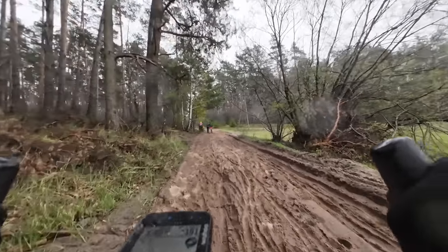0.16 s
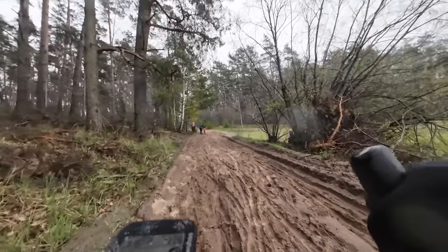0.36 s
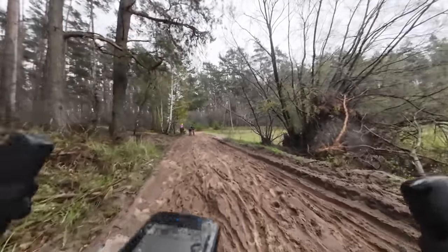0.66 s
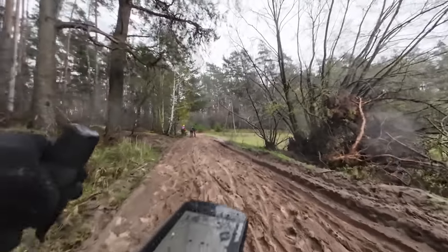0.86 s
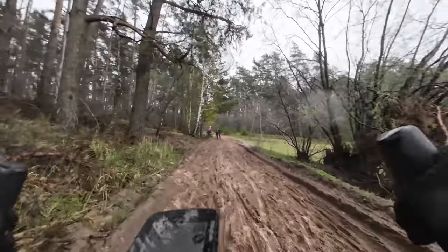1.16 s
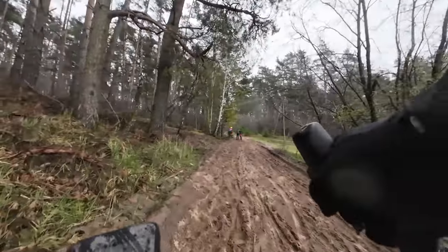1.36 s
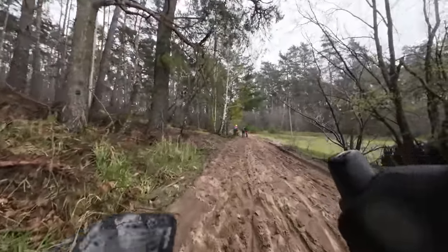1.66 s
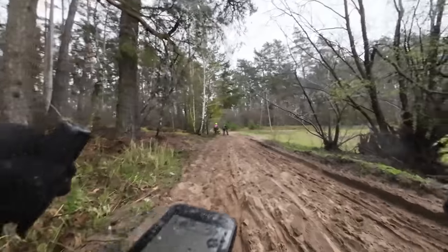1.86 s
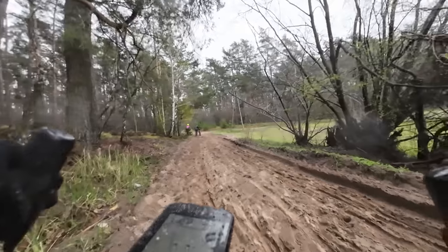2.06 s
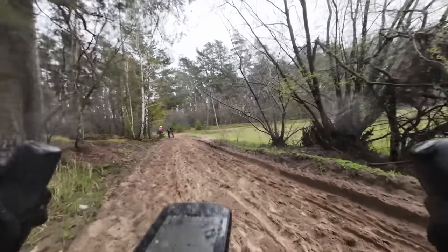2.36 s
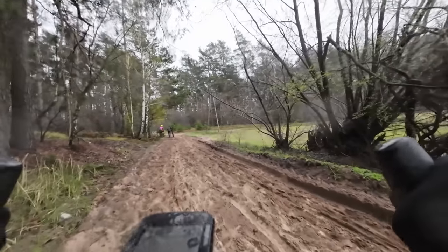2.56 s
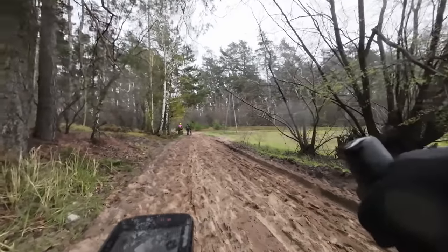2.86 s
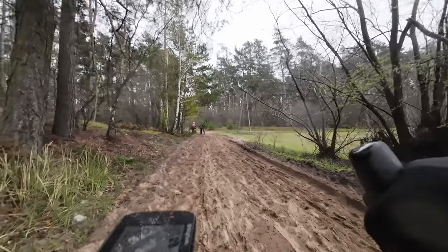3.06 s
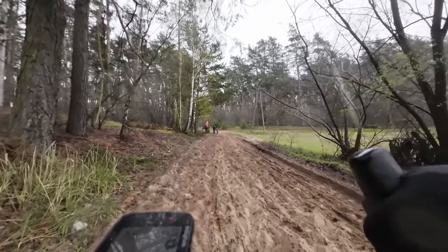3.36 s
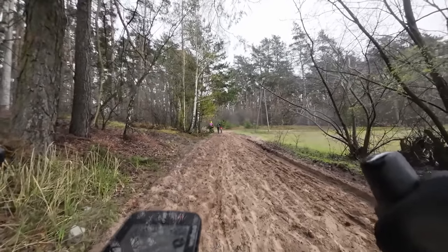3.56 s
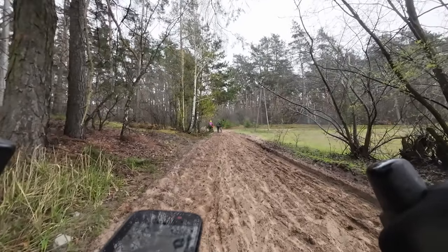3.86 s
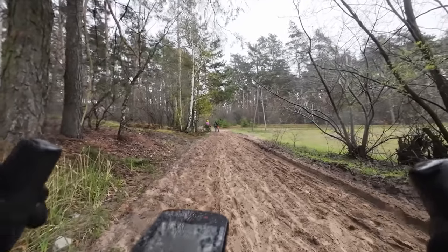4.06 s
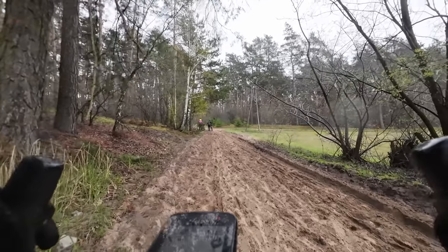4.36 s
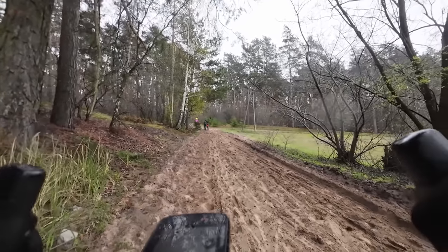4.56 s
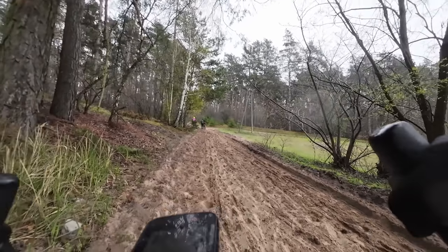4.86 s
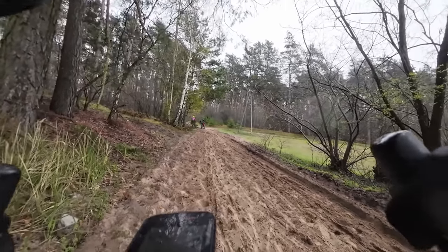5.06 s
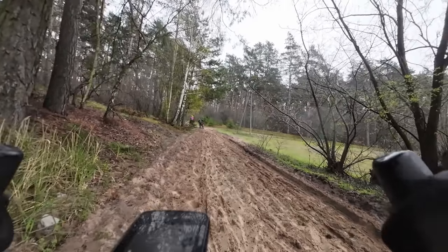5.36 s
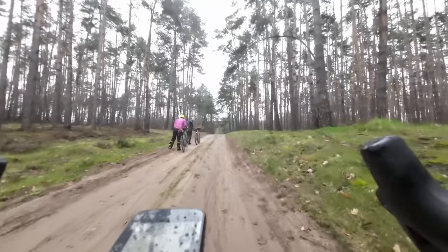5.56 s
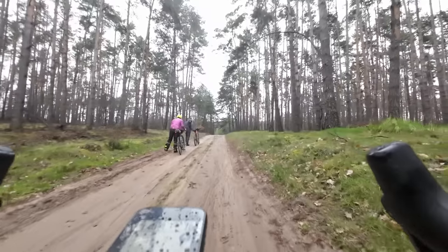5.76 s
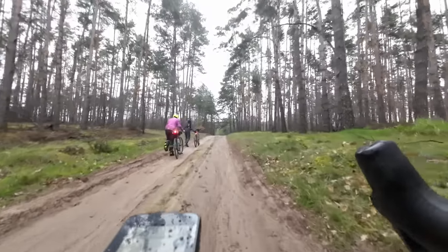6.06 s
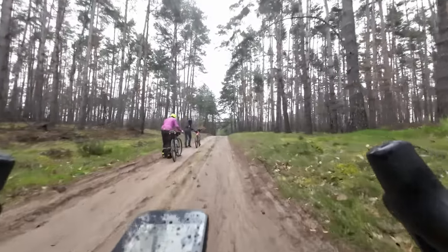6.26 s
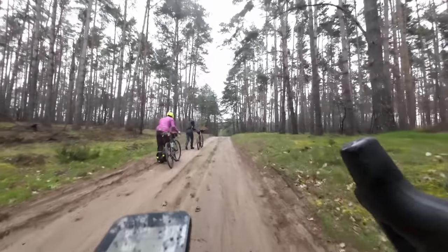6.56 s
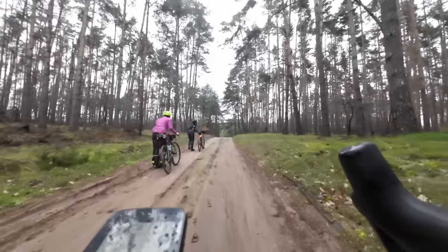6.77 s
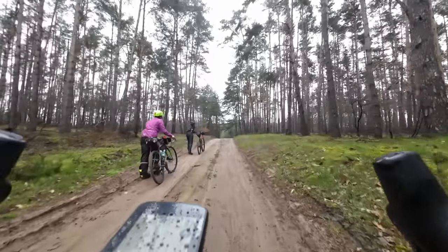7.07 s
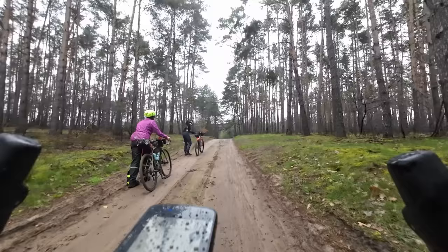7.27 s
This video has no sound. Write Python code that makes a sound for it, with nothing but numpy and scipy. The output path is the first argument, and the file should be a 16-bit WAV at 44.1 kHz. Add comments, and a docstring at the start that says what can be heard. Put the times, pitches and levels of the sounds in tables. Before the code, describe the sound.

A handlebar-mounted microphone catches a rough forest ride. First comes loud, uneven mud rattle, with knocks, bright snaps, flung grit and low bar thuds. Then a smoother stretch falls quiet, leaving faint frame taps and a soft wiping rub. Suddenly the rolling returns on firm sand, steadier, drier and wider, pebbles cracking more strongly on the right, low gusts bumping near the end.

```python
"""Bicycle on mud, then sand

A bicycle rolls over rutted wet mud, a smoother stretch and then, almost at once, firm sand, heard from
a camera on the handlebar. Random grit blows ring the camera mount hollowly near 500 Hz, and stones
knock it hard enough to drive the limiter. Noise swells make the squelching mud and flung grit, gliding
sines make the tyre hoot, bending modes make the bar hum, and low noise rumbles and gusts underneath."""
import sys
import numpy as np
from scipy import signal
from scipy.fft import rfft, irfft, next_fast_len
from scipy.io import wavfile
from scipy.ndimage import uniform_filter1d, minimum_filter1d, map_coordinates

SR = 44100
rng = np.random.default_rng(int(sys.argv[2]) if len(sys.argv) > 2 else 0)


def materialize(psi):
    """Save the field psi as 16-bit PCM at rate SR to the path in sys.argv[1].

    A 1-D psi becomes a single channel; in a 2-D psi each row is a channel.
    """
    bounded = np.clip(np.atleast_2d(psi).T, -1, 1)
    quanta = np.round(bounded * 32767).astype(np.int16)
    wavfile.write(sys.argv[1], SR, quanta)


N = 327222
TIME_S = np.arange(N) / SR

SAND_START_S = 5.416
RUTS_END_S, RUTS_FADE_S = 3.72, 0.048  # the deep mud is gone by the first, after a fade this long

# colour of the camera mount when shaken in mud: (frequency [Hz], level [dB])
MOUNT_COLOUR = [(100, -39), (170, -22), (250, -14.5), (310, -10.5), (350, -19), (404, -0.5), (457, -4),
                (510, 4), (555, -3), (610, 1.5), (680, -2.5), (790, -12.5), (900, -20.5), (1030, -43),
                (1600, -58.5), (2640, -110)]
# ringing of the camera shell under crushed grit: (frequency [Hz], width [Hz], level [dB])
SHELL_MODES = [(1170, 340, -12.5), (1440, 170, 1), (1723, 130, 2.5), (1950, 65, -3.5), (2448, 29, -12),
               (2680, 130, -21), (2980, 180, -15.5), (3500, 37, -25), (3820, 56, -20), (4370, 78, -25),
               (5300, 330, -42)]
# ringing of the frame and camera bracket when lightly tapped: (frequency [Hz], width [Hz], level [dB])
FRAME_MODES = [(487.4, 73.4, 7.5), (568.5, 26, 8), (884, 25, -7.5), (1480, 17, -26.5), (2000, 64, -43),
               (3130, 57, -46.5), (3570, 63, -53), (4270, 140, -60.5), (5540, 330, -63.5)]
# ringing of the bike's thin tubes, ticked by wet grains: (frequency [Hz], width [Hz], level [dB])
TUBE_MODES = [(1457, 95, 6), (1630, 74, -5.5), (1990, 42, -7.5), (2700, 92, -12), (3070, 58, -10),
              (3587, 54, -14.5), (4260, 160, -24.5), (5200, 330, -29.5)]
RATTLE_SHARE = 0.63  # share of the shaking power in deep mud that goes to the mount; the frame gets the rest
SLIDE_EASE_DB = -1  # change of the shaking while the tyre slides


def mud():
    """Deep mud rattles the mount and crunches in clumps; smoother ground rubs the frame and ticks the tubes."""
    shake_db, crunch_db = mud_levels()
    rattling = RATTLE_SHARE * np.clip((RUTS_END_S - TIME_S) / RUTS_FADE_S, 0, 1)
    deep, smooth = np.sqrt(rattling), np.sqrt(1 - rattling)

    blows = shifting(grit(per_second=750, spread_db=3.0, count=7), depth_db=2.5, rate=11)
    mount = swaying(shaken(blows, MOUNT_COLOUR, vary_db=6.5))
    frame = shaken(grit(per_second=550, spread_db=1.5), colour(FRAME_MODES), vary_db=1.5)
    frame *= amp(2.4 * wobble(22) - 1.5)  # the rubbing comes in fits

    fine = shifting(grit(per_second=1300, spread_db=3.0, count=7), depth_db=3.5, rate=11)
    fine *= amp(2.6 * wobble(45))
    crunch = shaken(blows + 0.57 * fine, colour(SHELL_MODES), vary_db=4.5)
    wet_clumps = shaken(grit(per_second=4000, spread_db=3, count=8), SWISH_COLOUR, vary_db=3)
    crunch += amp(-8 + 4 * wobble(28)) * wet_clumps
    crunch *= amp(2.5 * wobble(35) - 1)  # spatters and gaps
    wet_grains = grit(per_second=500, spread_db=3) * amp(8 * wobble(45))
    flecks = shaken(wet_grains, colour(TUBE_MODES), vary_db=3.5)

    sliding = sum(slide(s, length) for s, length, *_ in JUDDERS)
    shaking = amp(shake_db + SLIDE_EASE_DB * sliding - 1.0) * (deep * mount + smooth * frame)
    crunching = amp(crunch_db) * (deep * crunch + amp(-4.0) * smooth * flecks)
    load = rebound(KNOCKS) * amp(1.3 * wobble(16))
    return load * (shaking + crunching)


# roughness of the rutted mud, before the trims below: (time [s], shaking [dB], crunch [dB])
RUTTED_GROUND = [(0.0, -20.5, -44.5), (0.42, -16.5, -39.5), (0.72, -23.5, -45), (0.96, -16, -45.5),
                 (1.45, -20, -47), (1.81, -16.5, -40.5), (2.05, -18.5, -45), (2.55, -19.5, -48.5),
                 (2.9, -19, -48.5), (3.31, -19.5, -53), (3.54, -18, -42.5), (3.68, -22, -55.5)]
# the same for the smoother stretch: (time [s], shaking [dB], crunch [dB])
SMOOTH_GROUND = [(3.74, -32, -61), (4.03, -28, -71), (4.21, -34, -78), (4.39, -41.5, -83), (4.6, -37, -73),
                 (4.77, -40.5, -76), (4.9, -30, -55), (5.06, -31, -54.5), (5.19, -34.5, -77),
                 (5.4, -32.5, -65)]
# clods that the tyre ploughs through: (time [s], length [s], shaking [dB], crunch [dB])
CLODS = [(0.301, 0.11, -15, -40.5), (0.54, 0.12, -10, -38), (1.188, 0.049, -14.5, -43.5),
         (1.545, 0.054, -33, -37.5), (2.156, 0.17, -10.5, -44), (3.454, 0.2, -15, -59),
         (3.799, 0.11, -22.5, -68.5), (4.799, 0.089, -17.5, -51), (5.023, 0.036, -33, -45),
         (5.083, 0.044, -21, -67)]
SHAKE_TRIM_DB, CRUNCH_TRIM_DB = 2.0, 1.5  # added to the roughness, but not to the clods
CLOD_ATTACK_S, CLOD_RELEASE_S = 0.0088, 0.031


def mud_levels():
    """Shaking and crunch in dB: the roughness of the ground, plus each clod while the tyre is in it."""
    shake, crunch = amp(curves(np.vstack([RUTTED_GROUND, SMOOTH_GROUND])))
    shake, crunch = amp(SHAKE_TRIM_DB) * shake, amp(CRUNCH_TRIM_DB) * crunch
    for s, length, shake_db, crunch_db in CLODS:
        entering = np.clip((TIME_S - s) / CLOD_ATTACK_S, 0, 1)
        leaving = np.clip(1 - (TIME_S - s - length) / CLOD_RELEASE_S, 0, 1)
        inside = entering * leaving
        shake = np.hypot(shake, amp(shake_db) * inside)
        crunch = np.hypot(crunch, amp(crunch_db) * inside)
    return decibels(shake), decibels(crunch)


# stones and ridges that knock the bike, before small trims: (time [s], knock [dB], crunch [dB])
KNOCKS = [(0.158, -3.5, -26), (0.182, 1, -28), (0.327, -5.5, -20), (0.343, -3.5, -32), (0.375, -3, -33),
          (0.433, -1.5, -15.5), (0.52, -2, -27.5), (0.567, -4, -23), (0.767, -2.5, -23),
          (0.801, -13, -24.5), (0.84, -6, -30), (0.868, -11, -26), (0.879, -5, -22), (0.932, -2.5, -31.5),
          (1.03, -0.5, -22), (1.146, -3.5, -37.5), (1.316, -2, -37), (1.369, -2, -19.5), (1.427, -6, -26),
          (1.495, -14.5, -26), (1.571, -5, -25), (1.635, -1, -13.5), (1.685, 0, -23.5), (1.77, -1, -29),
          (1.832, -1, -26), (1.916, -6.5, -35), (1.973, -1.5, -47), (2.094, -2.5, -23), (2.148, -12, -25),
          (2.225, 3, -18.5), (2.271, 2, -18.5), (2.33, -5.5, -44), (2.347, -2.5, -36), (2.422, -2, -40),
          (2.445, 1.5, -24.5), (2.521, -2, -37), (2.606, -6, -38), (2.701, 1, -31.5), (2.754, -5.5, -28.5),
          (2.785, -2.5, -35), (2.803, -2.5, -35), (2.829, -4.5, -38.5), (2.854, -2, -39),
          (2.957, -0.5, -34.5), (3.07, 1, -25), (3.081, -3, -30), (3.164, 4.5, -23.5), (3.18, -7.5, -24.5),
          (3.334, -11, -31.5), (3.444, -12, -26), (3.512, -5.5, -35), (3.529, 4.5, -15.5), (3.649, -3, -23),
          (3.679, 1, -21), (3.79, -23, -39), (3.834, -34, -44.5), (4.002, -15.5, -44),
          (4.079, -22.5, -41.5), (4.12, -15.5, -44), (4.165, -28, -41), (4.267, -23, -55),
          (4.311, -16, -44), (4.488, -21.5, -57.5), (4.533, -31.5, -48), (4.643, -24, -48),
          (4.715, -24, -68), (4.775, -42, -47), (4.808, -20, -31), (4.843, -22, -39), (4.861, -13.5, -28.5),
          (4.902, -25.5, -43), (4.928, -24, -43), (4.964, -28, -45), (5.028, -21, -28), (5.068, -15.5, -32),
          (5.124, -9.5, -69), (5.248, -19, -63), (5.33, -16.5, -47)]
# short ping of the camera shell under a sharp stone: (frequency [Hz], width [Hz], level [dB])
PING_MODES = [(1719, 120, 3), (2415, 92, -6), (3480, 53, -20)]
PING_DELAY_S, PING_DB = 0.002972, 3  # after the knock begins; relative to the crunch


def knocks(count=3):
    """A stone slams the bike, which chatters back more weakly; grit is crushed and the shell pings."""
    track, crush = np.zeros(N), np.zeros(N)
    frame, ping = colour(FRAME_MODES), colour(PING_MODES)
    t = np.arange(SR // 10) / SR
    burst = (1 - np.exp(-t / 0.0031)) * np.exp(-t / 0.0028)
    for s, db, crunch_db in KNOCKS:
        rattling = heavy(db, from_db=-14.5, span_db=12.5)  # light blows only ring the frame

        def body():
            """One blow, shared between the mount and the frame."""
            return rattling * ring(MOUNT_COLOUR, vary_db=5.0) + (1 - rattling) * ring(frame, vary_db=5.5)

        add(track, s, amp(db + 0.5) * body())
        chatter_delays = np.cumsum(rng.uniform(0.00306, 0.006426, count))
        for k, delay in enumerate(chatter_delays):
            add(track, s + delay, amp(db - 5.5 - 3.1 * rattling - 3.1 * k) * body())
        add(crush, s, amp(crunch_db + 8) * burst)
        sharp = heavy(crunch_db, from_db=-21, span_db=7)  # only the sharpest stones ping
        add(track, s + PING_DELAY_S, amp(crunch_db + PING_DB) * sharp * ring(ping, vary_db=4.5))
    deep, smooth = (shaken(grit(per_second=3000, spread_db=2, count=8), colour(modes), vary_db=3)
                    for modes in (SHELL_MODES, TUBE_MODES))
    return track + crush * np.where(TIME_S < RUTS_END_S, deep, smooth)


# a hard blow lifts the tyre, so the rolling eases just after it; the depth is for a blow of 0 dB or more
REBOUND_S, REBOUND_HALF_S, REBOUND_DB = 0.044, 0.022, 0.5


def rebound(blows):
    """Gain of the rolling noise: the harder a blow, the more it unloads the tyre a moment later."""
    dips = [(s + REBOUND_S, min(db, 0), REBOUND_HALF_S) for s, db, *_ in blows]
    return amp(-REBOUND_DB * swells(dips))


# colour of the mount on sand, alike at both ports: (frequency [Hz], level [dB])
SAND_COLOUR = [(100, -40.5), (180, -18), (300, -13.5), (400, -6.5), (590, 3), (680, -7), (803, -5),
               (1000, -17), (1200, -32), (1700, -55.5), (2600, -49.5), (5000, -100)]
# colour of the shaking that differs between the ports: (frequency [Hz], level [dB])
SAND_SIDE_COLOUR = [(60, -22), (130, -26), (200, -33), (340, -21.5), (500, 12.5), (634, -13), (800, 15.5),
                    (1110, -21.5), (2000, -55), (5000, -96)]
# colour of the scraping sand: (frequency [Hz], level [dB])
SCRAPE_COLOUR = [(700, -26), (900, 1.5), (1080, 2.5), (1230, 2.5), (1430, 10), (1700, -7), (2400, -22.5),
                 (3000, -15), (3350, -26.5), (3800, -20), (4700, -33.5), (5700, -39), (6800, -62.5),
                 (12000, -82.5)]
# colour of a dull thud: (frequency [Hz], level [dB])
THUD_COLOUR = [(40, -22.5), (90, -14.5), (130, -15), (220, -3), (310, 12.5), (420, -5), (800, -47.5),
               (2000, -83), (5000, -120)]
# patches of loose sand: (middle time [s], scraping [dB], half length [s])
LOOSE_SAND = [(5.62, -41.5, 0.041), (5.73, -41, 0.036), (5.85, -36, 0.059), (6.02, -47, 0.056),
              (6.57, -44, 0.095), (6.85, -39, 0.11)]
# ripples that shake the mount harder: (middle time [s], shaking [dB], half length [s])
RIPPLES = [(5.74, -20.5, 0.015), (5.83, -27, 0.014), (6.01, -25, 0.015), (6.1, -22.5, 0.032),
           (7.23, -25.5, 0.095)]
# firm sand is even: steady shaking, scraping before the port trims, and how far both wander
SAND_SHAKE_DB, SAND_SCRAPE_DB, SAND_WANDER_DB = -17.5, -44, 0.84
SHAKE_PER_SCRAPE = 0.33  # dB of shaking for each dB of extra scraping


def sand():
    """Firm sand shakes the two ports a little differently; loose patches scrape, dull thuds follow the rumble."""
    loose_db = decibels(1 + swells(LOOSE_SAND) / amp(SAND_SCRAPE_DB))
    load = rebound(PEBBLES) * amp(SAND_WANDER_DB * wobble(13))
    shake = load * (amp(SAND_SHAKE_DB + SHAKE_PER_SCRAPE * loose_db) + swells(RIPPLES))

    blows = shifting(grit(per_second=900, spread_db=3.2, count=8), depth_db=3, rate=14)
    mid = shake * shaken(blows, SAND_COLOUR, vary_db=3)
    mid_thuds = shaken(grit(per_second=440, spread_db=-1.0), THUD_COLOUR, vary_db=3.5)
    mid += heave() * amp(-0.5) * mid_thuds
    side_blows = grit(per_second=1400, spread_db=7.5)
    side = shake * amp(-19.5) * shaken(side_blows, SAND_SIDE_COLOUR, vary_db=0.5)
    side_thuds = shaken(grit(per_second=330, spread_db=6.0), THUD_COLOUR, vary_db=1.5)
    side += heave() * amp(-26.0) * side_thuds
    # the right port is livelier; these points are (frequency in Hz, gain)
    lean = filtered(mid, lambda hz: along([(500, .01), (800, 0.25), (1600, .25)], hz))

    scrape = np.array([shaken(grit(per_second=600, spread_db=6, count=8), SCRAPE_COLOUR, vary_db=2.5)
                       for port in range(2)])
    scrape_db = SAND_SCRAPE_DB + loose_db + 2.2 * wobble(40)
    scrape = load * amp(scrape_db) * amp([[-1.5], [2.5]]) * scrape  # left, right
    return np.array([mid + side - lean, mid - side + lean]) + scrape


# pebbles clicking against the bike, before the left-right trims: (time [s], knock [dB], crack [dB])
PEBBLES = [(5.417, -1.5, -11.5), (5.463, -7, -47), (5.564, -12, -40.5), (5.741, -6.5, -38),
           (5.846, -6.5, -42), (6.044, -12, -42), (6.13, -10.5, -36.5), (6.173, -1, -17), (6.254, -5, -41),
           (6.314, 4, -9.5), (6.398, -6, -24), (6.418, -1, -16), (6.632, -12, -44), (6.826, -3.5, -39),
           (6.869, -4, -40), (7.043, -7, -42), (7.101, -3.5, -46), (7.28, 0.5, -18), (7.398, -11, -38)]
# colour of a pebble's knock: (frequency [Hz], level [dB])
PEBBLE_COLOUR = [(150, -22.5), (380, -4), (540, 20), (790, 24.5), (1050, -4), (1600, -14), (3200, -50),
                 (8000, -90.5)]
# colour of its dry crack: (frequency [Hz], level [dB])
CRACK_COLOUR = [(400, -23.5), (1000, 2.5), (1500, -5.5), (2050, -1.5), (2400, -6), (2900, -16), (3450, -12),
                (4000, -17), (4700, -24), (5600, -19), (8000, -35), (15000, -50.5)]
CRACK_DELAY_S = 0.0008  # a pebble cracks just after its knock begins
CRACK_PAN_DB, PORT_LEAD_S = 3, 0.00005  # crack louder and earlier at the right, the opposite at the left


def pebbles():
    """Single dry knocks and ringing cracks, louder at the right port; each port colours them a little."""
    track = np.zeros((2, N))
    for s, db, crack_db in PEBBLES:
        body, snap = ring(PEBBLE_COLOUR, vary_db=6.5, count=30), ring(CRACK_COLOUR, vary_db=1.5)
        for port, side in zip(track, (-1, 1)):
            knock = (body + ring(PEBBLE_COLOUR, vary_db=2.0, count=30)) / 2
            add(port, s, amp(db + 1.1 * side) * knock)
            crack = (snap + ring(CRACK_COLOUR, vary_db=5)) / 2
            crack = crack + amp(-15) * ring(colour(PING_MODES), vary_db=4)
            start_s = s + CRACK_DELAY_S - side * PORT_LEAD_S
            add(port, start_s, amp(crack_db + side * CRACK_PAN_DB) * crack)
    return track


# bending of the handlebar and fork: (frequency [Hz], width [Hz], level [dB])
BAR_MODES = [(90.5, 14, -6.5), (144, 19, -12), (212, 4.1, -8.5)]
# ruts that jolt the handlebar, loudness before the ring is scaled: (time [s], level [dB])
RUTS = [(0.567, -11.5), (2.227, -15.5), (3.076, -11.5), (3.137, -15), (3.536, -14.5), (3.687, -11.5),
        (4.716, -28)]
# low booms: the bar on corrugated ground, then a wind gust near 60 Hz:
# (middle time [s], level [dB], half length [s], pitch [Hz])
LOW_BOOMS = [(3.113, -18, 0.03, 87.6), (3.765, -21.5, 0.1, 88), (3.93, -29, 0.08, 90.7),
             (7.187, -21.5, 0.088, 61)]
# hum at 0 dB of shaking in mud, dB of hum per dB of shaking, steady hum on sand
MUD_HUM_DB, HUM_PER_SHAKE, SAND_HUM_DB = -25, 0.59, -36
UPPER_BENDING_DB = -5.5  # the higher bending modes, relative to the lowest
RUT_THUD_DB = -1  # dull thud of the frame, relative to the jolt


def handlebar():
    """The ground keeps the bar's bending modes trembling; ruts thud and ring it; corrugations and a gust boom."""
    shake_db, _ = mud_levels()
    hum = amp(by_ground(MUD_HUM_DB + HUM_PER_SHAKE * shake_db, SAND_HUM_DB))

    def bending(x, modes):
        """The bar's answer to x, weakened below 70 Hz."""
        return filtered(x, lambda hz: resonances(modes, hz) * hz ** 2 / (hz ** 2 + 70 ** 2))

    lowest, upper = (levelled(bending(rng.standard_normal(N), modes))
                     for modes in (BAR_MODES[:1], BAR_MODES[1:]))
    jolts, thuds = np.zeros(N), np.zeros(N)
    for s, db in RUTS:
        jolts[round(s * SR)] = amp(db)
        add(thuds, s, amp(db + RUT_THUD_DB) * ring(THUD_COLOUR, vary_db=5.0))
    jolt_ring = bending(jolts, BAR_MODES)
    jolt_ring *= jolts.max() / np.abs(jolt_ring).max()  # loudest ring peaks at the level of the hardest jolt
    booms = sum(swells([(s, db, half)]) * (tone(hz) + amp(-9) * upper) for s, db, half, hz in LOW_BOOMS)
    return hum * (lowest + amp(UPPER_BENDING_DB) * upper) + booms + jolt_ring + thuds


# slips on the side of a rut: (time [s], length [s], level [dB], start pitch [Hz], end pitch [Hz])
JUDDERS = [(0.637, 0.055, -7.5, 455, 525), (1.238, 0.0324, -6.5, 550, 527), (1.275, 0.024, -2, 508.3, 552),
           (3.391, 0.019, -8, 570, 540)]
JUDDER_EDGE_S = 0.0052  # a slide sets in and ends this quickly


def judders():
    """Rubber sticks and slips in step with the mount: a brief, gliding hoot with a weak third harmonic."""
    waver = 1 + .012 * wobble(90)
    track = np.zeros(N)
    for s, length, db, start_hz, end_hz in JUDDERS:
        pitch_hz = np.interp(TIME_S, [s, s + length], [start_hz, end_hz]) * waver
        phase = 2 * np.pi * np.cumsum(pitch_hz) / SR
        track += amp(db) * slide(s, length) * (np.sin(phase) + amp(-39) * np.sin(3 * phase))
    return track * amp(0.41 * wobble(88))


def slide(s, length):
    """Share 0-1 that the tyre slides, with smooth edges."""
    from_edge_s = np.minimum(TIME_S - s, s + length - TIME_S)
    return np.sin(np.pi / 2 * np.clip(from_edge_s / JUDDER_EDGE_S, 0, 1))


# wet mud squeezed from under the tread: (middle time [s], level [dB], half length [s])
SQUELCHES = [(0.768, -32, 0.014), (1.37, -35, 0.017), (3.168, -35, 0.019), (3.448, -36.5, 0.0028),
             (3.66, -41, 0.0062), (3.686, -36.5, 0.014), (5.03, -51, 0.0037)]
# colour of the spray: (frequency [Hz], level [dB])
SPRAY_COLOUR = [(600, -29.5), (1600, 16), (2600, 11), (3600, -6), (4800, -9.5), (7700, -14.5), (9000, -31),
                (15000, -43.5)]


def squelches():
    """Squeezed mud spits droplets in clumps, in short swells."""
    droplets = grit(per_second=3000, spread_db=4, count=8) * amp(2 * wobble(250))
    return swells(SQUELCHES) * shaken(droplets, SPRAY_COLOUR, vary_db=3)


# bright snaps as the hardest knocks overdrive the microphone: (time [s], peak level [dB])
SNAPS = [(0.185, -28.5), (0.434, -23.5), (1.033, -25), (1.637, -27.5), (2.275, -24), (2.446, -37.5),
         (2.471, -42.5), (2.524, -38.5), (2.856, -35), (3.17, -28), (3.533, -17), (3.683, -24)]
# colour of a snap: (frequency [Hz], level [dB])
SNAP_COLOUR = [(500, -19.5), (1700, 4), (3000, -2.5), (6000, -11), (10000, -21.5), (15000, -28.5)]


def snaps():
    """Bright snaps as the hardest knocks overdrive the microphone, each made as one short ring."""
    track = np.zeros(N)
    for s, db in SNAPS:
        add(track, s, amp(db) * ring(SNAP_COLOUR, vary_db=6))
    return track


# fine grit flung over the bike: (middle time [s], level [dB], half length [s])
SWISHES = [(0.235, -39, 0.008), (0.37, -48.5, 0.061), (0.62, -51.5, 0.069), (0.975, -46, 0.0047),
           (1.58, -42.5, 0.11), (1.87, -48.5, 0.064), (2.19, -46.5, 0.1), (2.81, -49, 0.034),
           (3.46, -58.5, 0.049), (5.71, -54, 0.053), (5.731, -45, 0.0067), (6.8, -58.5, 0.22),
           (6.927, -41, 0.0073)]
# colour of the fine grit: (frequency [Hz], level [dB])
SWISH_COLOUR = [(900, -40.5), (1700, 4.5), (2050, 3.5), (2300, -4.5), (2800, 1.5), (3150, -0.5),
                (3350, -18.5), (3600, -6), (4100, -13), (4800, -23.5), (5600, -22), (6500, -40.5),
                (12000, -70)]


def swishes():
    """The tread flings fine grit over the bike in bright swells that crackle in clumps."""
    grains = grit(per_second=2200, spread_db=5, count=8) * amp(4 * wobble(90))
    return swells(SWISHES) * shaken(grains, SWISH_COLOUR, vary_db=3)


# the tyre wall wipes soft mud: (middle time [s], level [dB], half length [s])
SLITHERS = [(4.25, -59, 0.06), (4.58, -54, 0.2), (4.85, -37.5, 0.06), (5.07, -52, 0.3), (5.3, -64.5, 0.34)]
# what the wiping sings in the frame: (frequency [Hz], width [Hz], level [dB])
SLITHER_MODES = [(890, 65, 7), (1130, 110, -14), (1430, 66, -11.5), (1660, 42, -14.5), (3030, 200, -28),
                 (3750, 160, -28.5), (5700, 350, -41.5)]


def slithers():
    """The tyre wall wipes along soft mud: a smooth rub that sings in the frame."""
    return swells(SLITHERS) * noise(colour(SLITHER_MODES))


# wet rubber sings on the side of a rut: (middle time [s], level [dB], half length [s])
SQUEALS = [(1.268, -36, 0.038)]
# pitch of the squeal: (frequency [Hz], width [Hz], level [dB])
SQUEAL_MODES = [(1427, 55, 0)]


def squeal():
    """Wet rubber sings thinly: a short swell of narrow noise."""
    return swells(SQUEALS) * levelled(noise(colour(SQUEAL_MODES)))


# colour of the rumble: (frequency [Hz], level [dB])
RUMBLE_COLOUR = [(8, -13.5), (25, 8.5), (60, -1.5), (80, -14), (150, -16.5), (300, -11), (800, -79),
                 (3000, -120)]
# colour of the rushing air: (frequency [Hz], level [dB])
AIR_COLOUR = [(100, -2), (1500, -14.5), (2200, -24.5), (4000, -24), (7000, -45), (15000, -54.5)]
RUMBLE_WANDER_DB = 3.5  # the rumble is lumpy
AIR_DB = -66


def rumble():
    """Ground shock and head wind, nearly alike at both ports, over the faint rush of the air."""
    apart = np.array([noise(RUMBLE_COLOUR), noise(RUMBLE_COLOUR)])
    apart_db = by_ground(-15, -10)  # more wind on the ports over the sand
    lumps = amp(RUMBLE_WANDER_DB * wobble(12) - 1.8)
    low_noise = noise(RUMBLE_COLOUR) + amp(apart_db) * apart
    return heave() * lumps * low_noise + amp(AIR_DB) * noise(AIR_COLOUR)


# low swells of rumble, from hollows in the mud and wind gusts on the sand:
# (middle time [s], level [dB], half length [s])
LOW_SWELLS = [(0.39, -27.5, 0.0506), (0.56, -27, 0.088), (1.05, -23.5, 0.056), (1.53, -28, 0.039),
              (3.11, -18.5, 0.027), (3.7, -30, 0.042), (6.75, -32.5, 0.089), (7.17, -21.5, 0.15)]
MUD_RUMBLE_DB, SAND_RUMBLE_DB = -38.5, -32  # before the lumps


def heave():
    """Gain of the rumble: steady on each ground, swelling in hollows of the mud and in gusts on the sand."""
    return amp(by_ground(MUD_RUMBLE_DB, SAND_RUMBLE_DB)) + swells(LOW_SWELLS)


def by_ground(in_mud, on_sand):
    """One value while the bike is in mud, another once it is on sand."""
    return np.where(TIME_S < SAND_START_S, in_mud, on_sand)


def grit(per_second, spread_db, count=4):
    """Blows at random moments, of random strength and sign, shared among several points of contact."""
    hit = rng.random((count, N)) < per_second / count / SR
    size = amp(spread_db * np.minimum(rng.standard_normal(N), 2))
    return hit * size * np.sign(rng.random(N) - .5)


def shifting(blows, depth_db, rate):
    """The load wanders between the points of contact, so the colour of the blows keeps changing."""
    return np.array([row * amp(depth_db * wobble(rate)) for row in blows])


def shaken(blows, spectrum, vary_db):
    """A body rung by the blows, at an even level."""
    return levelled(sum(signal.oaconvolve(row, ring(spectrum, vary_db))[:N] for row in blows))


SWAY_DB, SWAY_SPLIT_HZ = 3, 430


def swaying(x):
    """As the load shifts, the lower and upper parts of a ringing body take turns at being stronger."""
    low = filtered(x, lambda hz: 1 / (1 + (hz / SWAY_SPLIT_HZ) ** 12))
    tilt_db = SWAY_DB * wobble(18)
    return levelled(amp(tilt_db) * low + amp(-tilt_db) * (x - low))


def ring(spectrum, vary_db, size=4096, count=60):
    """Answer of a body to one blow, peak 1, each time coloured a little differently at random."""
    hz = np.fft.rfftfreq(size, 1 / SR)
    tint = np.transpose([np.geomspace(100, SR / 2, count), rng.standard_normal(count)])
    gain = np.maximum(amp(along(spectrum, hz) + vary_db * along(tint, hz)), 1e-6)
    # folding the cepstrum gives minimum phase: the sound starts at once and then dies away
    cepstrum = irfft(np.log(gain))
    cepstrum[1:size // 2] *= 2
    cepstrum[size // 2 + 1:] = 0
    answer = irfft(np.exp(rfft(cepstrum)))
    return answer / np.abs(answer).max()


def resonances(modes, hz):
    """Complex response of (Hz, width, dB) modes; it falls steeply above each."""
    return sum((-1) ** k * amp(db) * c * w / (c * c - hz * hz + 1j * hz * w)
               for k, (c, w, db) in enumerate(modes))


SOFT_TOP_HZ = 6300  # rubber and mud excite little above this


def colour(modes):
    """(Hz, width, dB) resonances as (Hz, dB) points with deep valleys; soft contact weakens the top."""
    hz = np.geomspace(100, 16000, 500)
    power = sum(amp(db) ** 2 / (1 + ((hz - c) / w) ** 2) ** 2 for c, w, db in modes)
    soft = 1 / (1 + (hz / SOFT_TOP_HZ) ** 10)
    return np.transpose([hz, 10 * np.log10(power * soft)])


def noise(spectrum):
    """Noise of rms 1 with the given colour."""
    return unit(filtered(rng.standard_normal(N), lambda hz: amp(along(spectrum, hz))))


def tone(hz):
    """A slightly unsteady sine of rms 1."""
    return np.sqrt(2) * np.sin(2 * np.pi * np.cumsum(hz * (1 + .025 * wobble(20))) / SR)


def wobble(rate):
    """A smooth random curve, rate knots a second."""
    return map_coordinates(rng.standard_normal(int(N * rate / SR) + 4), [np.arange(N) * rate / SR])


def swells(rows):
    """Gain over time of bell-shaped (middle s, dB, half length s) swells."""
    return sum(amp(db) * np.exp(-((TIME_S - s) / half) ** 2) for s, db, half in rows)


def heavy(db, from_db, span_db):
    """Share 0-1 that grows as a blow gets harder than from_db."""
    return np.clip((db - from_db) / span_db, 0, 1)


def add(track, s, sound):
    """Mix a sound into the track at time s."""
    start = max(round(s * SR), 0)
    track[start:start + len(sound)] += sound[:N - start]


def levelled(x):
    """x near rms 1, its power evened out with a window of a seventh of a second."""
    x = unit(x)
    window = signal.windows.hann(SR // 7)
    power = signal.oaconvolve(x ** 2, window / window.sum(), "same")
    return x / np.sqrt(np.abs(power) + 1e-3)


def filtered(x, response):
    """x passed through a response that depends on frequency."""
    size = next_fast_len(N + SR // 2)
    return irfft(rfft(x, size) * response(np.fft.rfftfreq(size, 1 / SR)), size)[..., :N]


def along(points, hz):
    """(Hz, value) points read on a log axis."""
    f, v = np.transpose(points)
    return np.interp(np.log(hz + 1), np.log(f + 1), v)


def curves(rows):
    """One value per sample for each column after the time."""
    s, *cols = np.transpose(rows)
    return [np.interp(TIME_S, s, c) for c in cols]


def unit(x):
    """x at rms 1."""
    return x / np.sqrt(np.mean(x ** 2) + 1e-20)


def amp(db):
    """Decibels to gain."""
    return 10 ** (np.asarray(db) / 20)


def decibels(gain):
    """Gain to decibels."""
    return 20 * np.log10(gain)


def scene():
    """The mud gives way to sand within a few milliseconds, under all the other sounds of the ride."""
    on_sand = np.clip((TIME_S - SAND_START_S) / .004, 0, 1)
    wet = squelches() + squeal() + swishes() + slithers()
    bike = (1 - on_sand) * mud() + knocks() + snaps() + judders() + wet + handlebar()
    ports = amp([[.12], [-.12]])  # left a touch louder than right
    return ports * bike + on_sand * sand() + pebbles() + rumble()


TOP_HZ = 15800


def record(dry):
    """A fast, smooth limiter catches each overload; a steep filter then removes what lies above TOP_HZ."""
    needed = 1 / np.maximum(np.abs(dry).max(axis=0), 1)
    held = minimum_filter1d(needed, size=120)
    gain = uniform_filter1d(uniform_filter1d(held, size=60), size=60)
    closing = np.minimum(np.arange(N)[::-1] / 130, 1)  # end without a click
    limited = dry * gain * closing
    return signal.sosfilt(signal.ellip(10, .1, 80, TOP_HZ, fs=SR, output="sos"), limited)


dry = scene()
out = record(dry)
materialize(out)
```